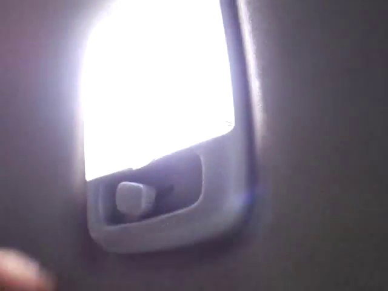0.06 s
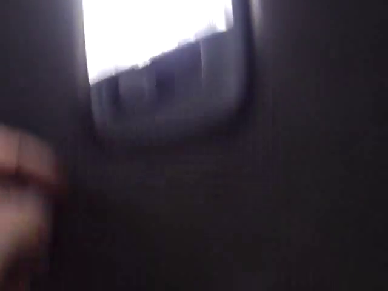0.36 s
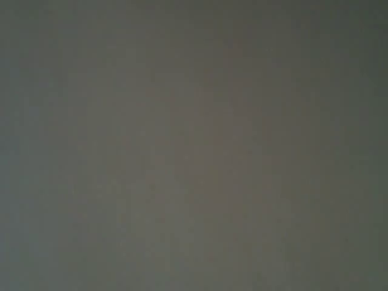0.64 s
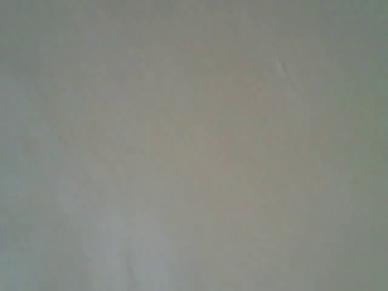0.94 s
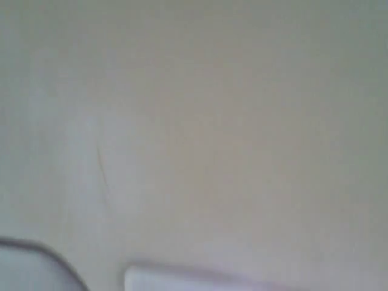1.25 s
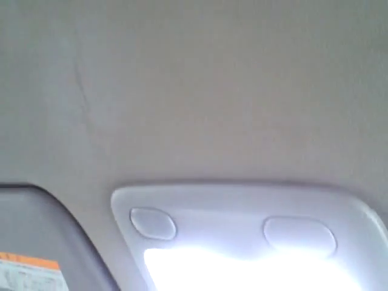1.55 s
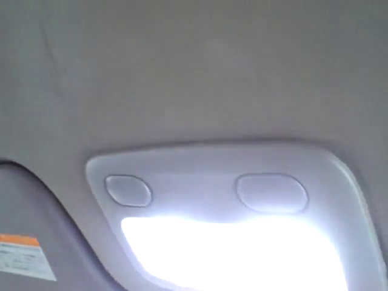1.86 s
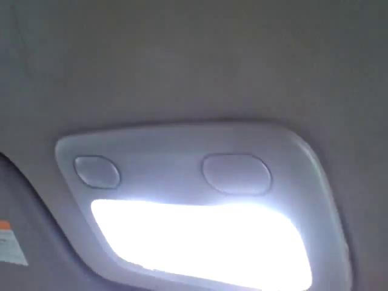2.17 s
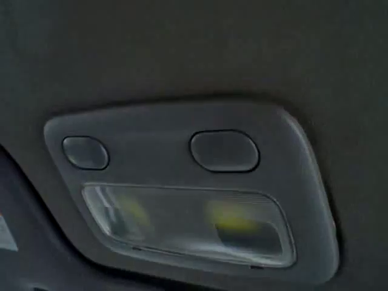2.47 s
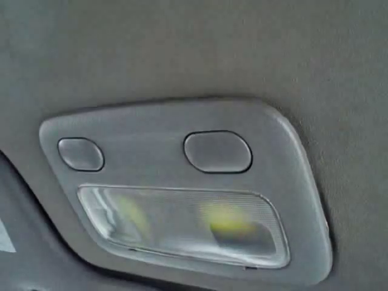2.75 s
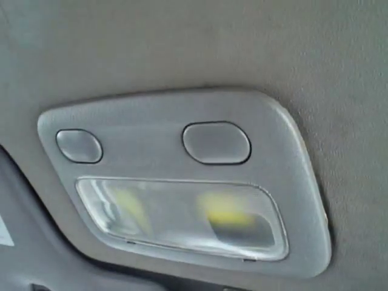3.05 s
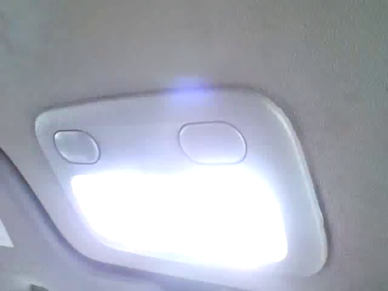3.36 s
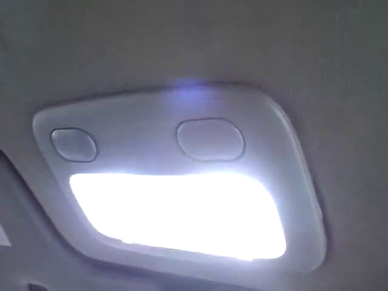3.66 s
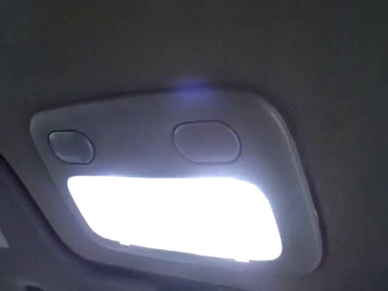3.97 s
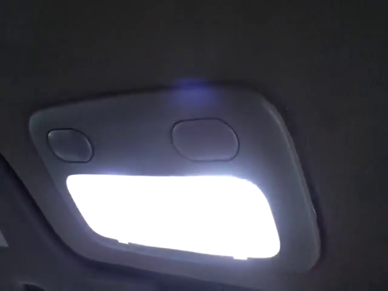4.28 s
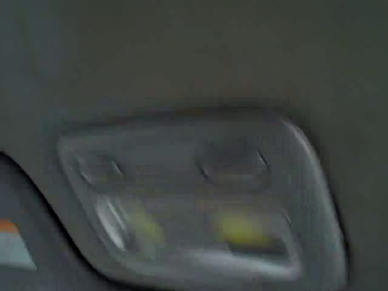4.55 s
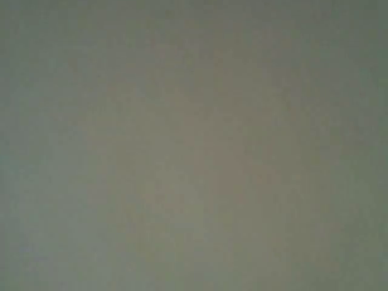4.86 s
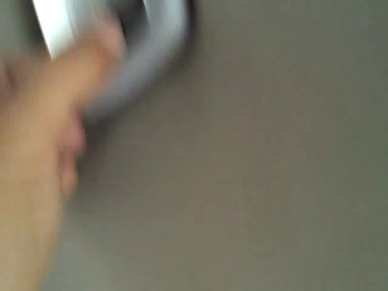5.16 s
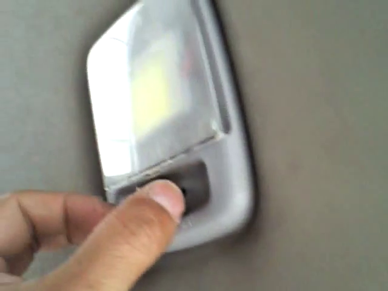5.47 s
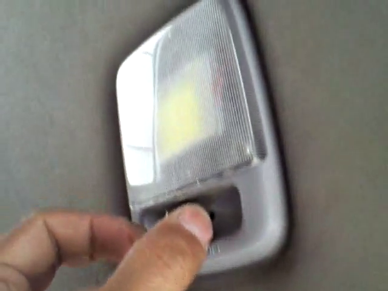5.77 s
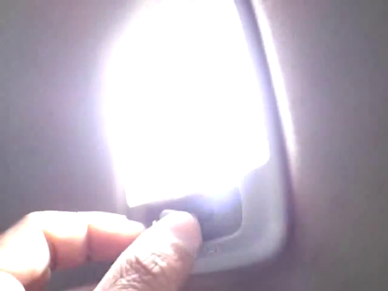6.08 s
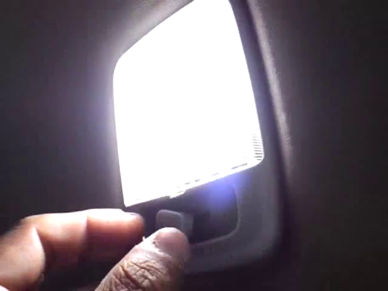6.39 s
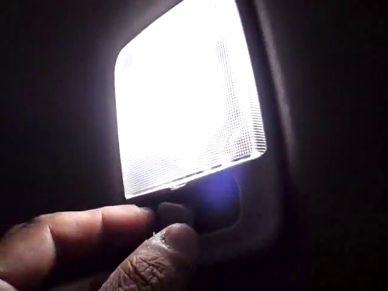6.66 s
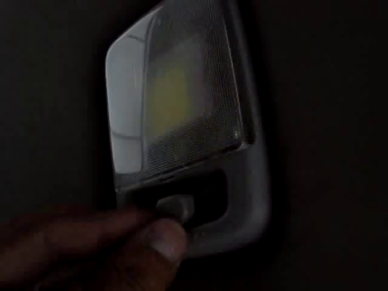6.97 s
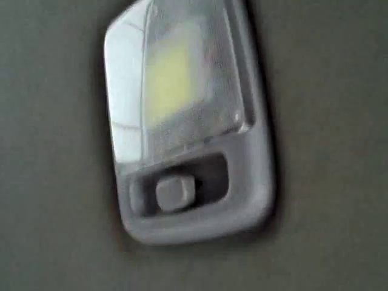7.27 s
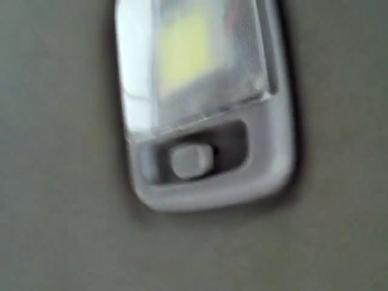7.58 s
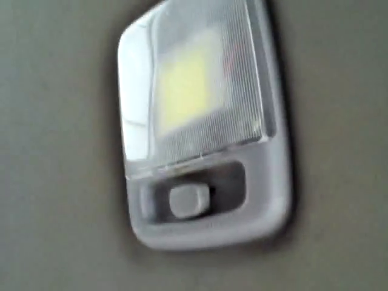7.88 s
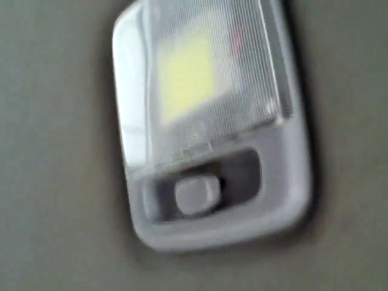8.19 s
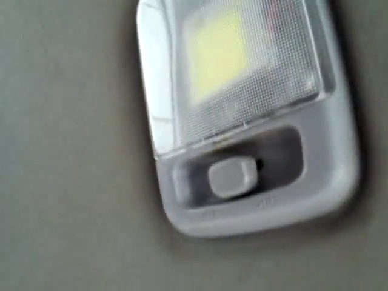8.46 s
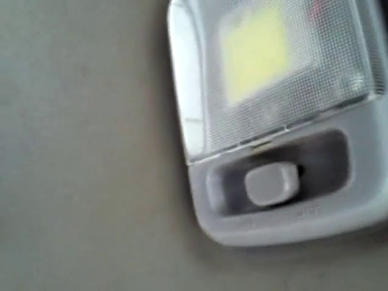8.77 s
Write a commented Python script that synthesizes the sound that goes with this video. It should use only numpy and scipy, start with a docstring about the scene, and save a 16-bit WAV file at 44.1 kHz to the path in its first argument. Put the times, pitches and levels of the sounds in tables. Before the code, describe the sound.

Plastic ceiling lamp switches click sharply inside a parked car, over steady hiss, low rumble and some handling rustles and creaks.

```python
"""Narrow-band microphone hiss, a low rumble and a rustling sleeve open the scene inside a parked car.
The switches of two plastic ceiling lamps are clicked five times, close to a hand-held camera.
Each snap rattles the lamp housing, drums the roof lining and booms briefly in the cabin.
The hand bumps softly throughout; near the end, fingers rub and creak on the camera case.
A last, drier click comes at the camera itself."""
import sys
import numpy as np
from scipy import signal
from scipy.fft import rfft, irfft, next_fast_len
from scipy.io import wavfile
from scipy.ndimage import uniform_filter1d

SR = 44100
rng = np.random.default_rng(int(sys.argv[2]) if len(sys.argv) > 2 else 0)


def int16_out(signal):
    """Quantize to a 16-bit WAV file."""
    q = np.round(np.clip(np.atleast_2d(signal).T, -1, 1) * 32767)
    wavfile.write(sys.argv[1], SR, q.astype(np.int16))


N = 389403
TIME_S = np.arange(N) / SR
AGE_S = TIME_S[:SR]  # time since an onset

# microphone hiss: (frequency [Hz], density [dB])
HISS_SPECTRUM = [(88, -44), (150, -5.5), (172, -22), (200, -1), (411, -1), (446, -1), (572, -5), (902, -4),
                 (1140, -6), (1660, -7.5), (3040, -10.5), (3440, -12.5), (4060, -28.5), (5280, -72.5),
                 (8930, -120)]
# cabin rumble: (frequency [Hz], density [dB])
RUMBLE_SPECTRUM = [(25, -35), (50, -18.5), (90, -5), (145, 0), (200, -8), (320, -10), (600, -16.5),
                   (1500, -47.5)]
# moves of the camera arm: (peak time [s], level [dB])
ARM_MOVES = [(.5, -44), (3.25, -50), (6.2, -51.5), (7.9, -44)]
# sleeve cloth: (frequency [Hz], density [dB])
CLOTH_SPECTRUM = [(59, -45), (100, -11), (145, 1.5), (198, -25), (376, -6.5), (436, -17), (713, -11),
                  (803, -14), (3500, -37.5), (4550, -61), (7700, -120)]
# sleeve strokes: (peak time [s], level [dB], rise [s], fall [s])
SLEEVE_STROKES = [(0.374, -31.5, 0.049, 0.071), (0.539, -33, 0.021, 0.018), (.79, -43, 0.024, 0.023)]
# hand bumps: (time [s], level [dB], pitch [Hz], treble roll-off [dB/octave], t60 [s])
HAND_BUMPS = [(.002, -38, 246, 8.5, 0.046), (.238, -38, 520, 12.5, 0.041), (.528, -32.5, 140, 21, .2),
              (.611, -37, 269, 16, 0.072), (.768, -34.5, 280, 12, 0.17), (.792, -32.5, 480, 38, 0.07),
              (1.622, -39.5, 195, 18, .045), (2.982, -43, 260, 12, .09), (4.266, -43.5, 283, 19, 0.13),
              (5.108, -41, 392, 9.5, 0.12), (6.014, -41, 770, 14.5, 0.16), (6.34, -39.5, 336, 9.5, 0.13),
              (6.65, -39.5, 320, 8.5, 0.14), (7.2, -34, 706, 21, 0.024), (8.628, -33.5, 355, 11.5, 0.021),
              (8.807, -31.5, 337, 9, .2)]
# camera case resonances: (frequency [Hz], width [Hz], creak level [dB], rub level [dB])
CASE_MODES = [(330, 410, 1, -4.5), (1025, 205, -0.5, 0), (1617, 296, -6, -5.5), (2590, 1260, -4, -7.5),
              (3272, 376, -2.5, -5)]
# finger rubs: (peak time [s], level [dB], rise [s], fall [s], pitch [Hz], lift at pitch [dB])
FINGER_RUBS = [(7.490, -40, 0.081, .015, 1800, 7.5), (7.510, -25, 0.01, 0.0065, 1400, 7.5),
               (7.650, -27.5, 0.0095, .033, 1050, 7.5), (7.820, -35.5, 0.078, 0.041, 3550, 9),
               (7.892, -31.5, .004, 0.017, 3500, 4.5), (7.924, -26, 0.019, 0.031, 3500, 3.5)]
# case creaks: (time [s], peak level [dB], pitch [Hz], lift at pitch [dB])
CASE_CREAKS = [(7.3195, -17, 1410, 3), (7.3909, -3, 1364, 17), (7.3936, -8, 1400, 12),
               (7.417, -17.5, 2600, 9), (7.7313, -18.5, 1020, 2), (7.79, -21, 2600, 7.5),
               (7.811, -15, 2700, 19), (7.8233, -7, 1680, 19), (7.833, -14, 1680, 12),
               (7.8506, -10, 3400, 3.5), (7.8594, -6, 1020, 13), (7.915, 1.5, 2600, 5.5),
               (7.924, -6, 3400, 13), (7.937, -13, 1680, 21), (8.0118, -4.5, 850, 21), (8.033, -4, 843, 15),
               (8.461, -26.5, 1920, 24)]
# light, bright first contact of a switch: (frequency [Hz], gain [dB])
CONTACT_SPECTRUM = [(150, -17), (600, -7), (2000, 0.5), (3000, -2), (4200, 2)]
# lamp housing: (frequency [Hz], gain [dB])
HOUSING_SPECTRUM = [(59, -34.5), (100, -5), (200, -7.5), (380, -1), (540, -8), (680, -6), (1050, -9),
                    (1500, -11), (2000, -9.5), (2850, -11), (3400, -19.5), (4000, -35), (5200, -68.5),
                    (8800, -120)]
# housing rattle: (band [Hz], t60 [s])
RATTLE_DECAYS = [(150, .11), (400, 0.11), (900, 0.1), (1700, 0.1), (3200, 0.082)]
# cabin reverberation: (band [Hz], t60 [s])
REVERB_DECAYS = [(150, 0.97), (400, 0.6), (900, 0.24), (1700, 0.27), (3200, 0.054)]
# lamp lens: (frequency [Hz], level [dB], t60 [s])
LENS_MODES = [(863, -3, 0.43), (1193, 1.5, 0.16), (1367, -2, .3), (1373, -10.5, 0.62), (1362, 2, 0.3),
              (1590, 0.5, 0.23), (1574, -5.5, 0.25), (1740, -11, 0.21), (2150, -5, .2)]
# roof lining: (frequency [Hz], level [dB], t60 [s])
LINING_MODES = [(272.4, -2, 0.59), (301.5, -0.5, 0.45), (321, -14, 0.8), (396.4, -8.5, 0.69),
                (431.5, 2.5, 0.42), (543, -3, 0.15), (675, -20, 0.5), (713, -11, 0.47)]
# roof panel: (frequency [Hz], level [dB], t60 [s])
PANEL_MODES = [(92, -2, 0.37), (113, -2.5, 0.22), (139.7, 4, 0.27), (180, -17, 0.18)]
# cabin air: (frequency [Hz], level [dB], t60 [s])
AIR_MODES = [(89.5, -18, 0.2), (125, -10, 0.32), (142.4, -4.5, 0.42), (151.4, -17, 0.93)]
# switch throws: (time [s], contact [dB], lag to blow [s], blow [dB], lens [dB], lining [dB], panel [dB],
# boom [dB], low note [Hz], low lift [dB], high note [Hz], high lift [dB], tilt [dB/octave])
SWITCH_THROWS = [(2.4521, -15.5, 0.0038, -11, -31.5, -24, -47.5, -38.5, 350, 2.5, 1330, 5, 0.5),
                 (3.2283, -13, .0090, -17, -60, -28.5, -17, -17.5, 520, 10, 2850, 9, -2),
                 (4.3824, -18.5, .0050, -9, -27.5, -25, -23, -23, 730, 4, 1400, 8.5, -.5),
                 (5.8204, -21, 0.0027, -11, -57.5, -23.5, -20.5, -26.5, 880, 5, 1850, 0.5, -1),
                 (6.8426, -21, .003, -2.5, -27, -21, -30.5, -28, 1080, 7.5, 1467, 8.5, -1.17),
                 (8.7105, -16.5, 0.01, -15, -58, -44, -36, -57, 215, 8, 2290, 1.5, -0.9)]


def amp(db):
    """Decibels to gain."""
    return 10 ** (np.asarray(db) / 20)


def unit_rms(x):
    """x at rms 1."""
    return x / np.sqrt(np.mean(x ** 2) + 1e-20)


def unit_burst(x, samples=440):
    """x with its loudest window at rms 1."""
    return x / np.sqrt(uniform_filter1d(x ** 2, samples).max() + 1e-20)


def log_interp(points, hz):
    """(frequency [Hz], value) points read on a log axis."""
    points_hz, values = np.transpose(points)
    return np.interp(np.log(hz + 1), np.log(points_hz), values)


def bell(hz, centre_hz, octaves):
    """Gaussian in log frequency, 1 at the centre."""
    return np.exp(-(np.log2(hz / centre_hz) / octaves) ** 2)


def filtered(x, response):
    """x through a response given as a function of Hz."""
    size = next_fast_len(len(x) + 8192)
    return irfft(rfft(x, size) * response(np.fft.rfftfreq(size, 1 / SR)), size)[:len(x)]


def coloured(x, spectrum, size=4096):
    """x through a minimum-phase filter with the given spectrum."""
    gain = amp(log_interp(spectrum, np.fft.rfftfreq(size, 1 / SR)))
    cepstrum = irfft(np.log(gain + 1e-6))
    cepstrum[1:size // 2] *= 2
    cepstrum[size // 2 + 1:] = 0
    impulse = irfft(np.exp(rfft(cepstrum)))
    return signal.fftconvolve(x, impulse)[:len(x)]


def fade(t60_s):
    """Decay of 60 dB in t60_s."""
    return np.exp(-np.log(1000) * AGE_S / t60_s)


def swell(rise_s):
    """Rise from 0 to 1."""
    return 1 - np.exp(-AGE_S / rise_s)


def stroke(t_s, rise_s, fall_s):
    """Pressure that swells up to t_s = 0, then ebbs."""
    return np.exp(-np.abs(t_s) / np.where(t_s < 0, rise_s, fall_s))


def add(track, at_s, sound):
    """Mix a sound into the track."""
    start = round(at_s * SR)
    track[start:start + len(sound)] += sound[:N - start]


def microphone_hiss(level_db=-50):
    """Steady noise of the microphone."""
    return amp(level_db) * unit_rms(coloured(rng.standard_normal(N), HISS_SPECTRUM))


def cabin_rumble(floor_db=-54, rise_s=0.43, fall_s=0.35):
    """Low rumble in the closed cabin swells when the camera is moved."""
    moves = sum(amp(db) * stroke(TIME_S - at_s, rise_s, fall_s) for at_s, db in ARM_MOVES)
    return (amp(floor_db) + moves) * unit_rms(coloured(rng.standard_normal(N), RUMBLE_SPECTRUM))


def sleeve_rustle(grain_db=2):
    """Cloth brushes in uneven grains as the arm is drawn back."""
    pressure = sum(amp(db) * stroke(TIME_S - at_s, rise_s, fall_s)
                   for at_s, db, rise_s, fall_s in SLEEVE_STROKES)
    grain = amp(grain_db * unit_rms(uniform_filter1d(rng.standard_normal(N), size=200)))
    return pressure * unit_rms(coloured(grain * rng.standard_normal(N), CLOTH_SPECTRUM))


def hand_bumps():
    """Soft contacts give dull thuds, hollower with a steeper roll-off."""
    out = np.zeros(N)
    for at_s, db, hz, rolloff_db, t60_s in HAND_BUMPS:
        push = rng.standard_normal(SR) * fade(t60_s) * swell(rise_s=0.009)
        tone = [(hz / 4, -20), (hz, 0), (hz * 2, -rolloff_db), (hz * 16, -4 * rolloff_db)]
        add(out, at_s, amp(db) * unit_burst(coloured(push, tone)))
    return out


def camera_case(force, levels_db, pitch_hz, lift_db, normalise, grip_octaves=0.5):
    """A force drives the case resonances; the grip favours those near its pitch."""
    out = 0
    for k, ((hz, width_hz, *_), db) in enumerate(zip(CASE_MODES, levels_db)):
        mode = filtered(force, lambda f: (2j * f * width_hz / (hz**2 - f**2 + 2j * f * width_hz)) ** 2)
        gain = amp(db + lift_db * bell(hz, pitch_hz, grip_octaves))
        out += (-1) ** k * gain * normalise(mode)
    return out


def finger_rubs(slips_per_s=4000):
    """Skin drags over the case in a dense stream of tiny slips."""
    out, lead_s = np.zeros(N), 0.25
    t_s = AGE_S[:SR // 2] - lead_s
    _, _, _, rub_db = np.transpose(CASE_MODES)
    for at_s, db, rise_s, fall_s, pitch_hz, lift_db in FINGER_RUBS:
        slips = rng.random(len(t_s)) < slips_per_s / SR
        force = slips * np.sign(rng.standard_normal(len(t_s))) * stroke(t_s, rise_s, fall_s)
        add(out, at_s - lead_s, camera_case(force, db + rub_db, pitch_hz, lift_db, unit_burst))
    return out


def case_creaks(chatter_gain=0.081, chatter_t60_s=0.028):
    """The gripped case slips in dry ticks: a jolt, then short chatter."""
    out = np.zeros(N)
    _, _, creak_db, _ = np.transpose(CASE_MODES)
    for at_s, db, pitch_hz, lift_db in CASE_CREAKS:
        force = (chatter_gain * rng.standard_normal(SR) * fade(chatter_t60_s))[:SR // 10]
        force[0] += 1  # jolt
        tick = camera_case(force, creak_db, pitch_hz, lift_db, unit_rms)
        add(out, at_s, amp(db) * tick / np.abs(tick).max())
    return out


def dense_modes(decays, rise_cycles):
    """Crowded modes as noise: each band builds up, then dies at its own rate."""
    noise, out = rng.standard_normal(SR), np.zeros(SR)
    centres_hz = [hz for hz, _ in decays]
    for (hz, t60_s), weights in zip(decays, np.eye(len(decays))):
        band = filtered(noise, lambda f: log_interp(list(zip(centres_hz, weights)), f))
        out += band * fade(t60_s) * swell(rise_cycles / hz)
    return out


def ring(modes, rise_s, blur_hz, spread_db=2.3):
    """Damped modes struck at random strengths; loose trim blurs each line."""
    out = 0
    step_cycles = np.sqrt(blur_hz / (2 * np.pi * SR))
    for hz, db, t60_s in modes:
        phase_cycles = rng.random() + step_cycles * np.cumsum(rng.standard_normal(SR))
        envelope = amp(db + rng.normal(0, spread_db)) * fade(t60_s)
        out += envelope * np.sin(2 * np.pi * (hz * AGE_S + phase_cycles))
    return unit_burst(swell(rise_s) * out)


def housing_tone(low_hz, low_db, high_hz, high_db, tilt_db_per_octave, note_octaves=0.25):
    """Housing spectrum, tilted, with the two notes that one throw favours."""
    hz = np.geomspace(50, 9000, 160)
    notes_db = low_db * bell(hz, low_hz, note_octaves) + high_db * bell(hz, high_hz, note_octaves)
    tilt_db = tilt_db_per_octave * np.log2(hz / high_hz)
    return np.transpose([hz, log_interp(HOUSING_SPECTRUM, hz) + notes_db + tilt_db])


def switch_contact(force, tone):
    """A light, bright touch of the switch, heard through the housing."""
    return unit_burst(coloured(coloured(force, CONTACT_SPECTRUM), tone), samples=180)


def switch_clicks(slide_db=-17.5, send_db=-11, lining_share=0.35, panel_lag_s=0.012, boom_lag_s=0.087):
    """The switch slides, tips over its spring, slams home and shakes lens, roof and cabin air."""
    out, lead_s = np.zeros(N), 0.1
    for at_s, contact_db, lag_s, blow_db, lens_db, lining_db, panel_db, boom_db, *notes in SWITCH_THROWS:
        tone = housing_tone(*notes)
        scrape = stroke(AGE_S[:SR // 5] - lead_s, rise_s=0.003, fall_s=0.003)
        slide = rng.standard_normal(len(scrape)) * scrape
        contact = rng.standard_normal(SR) * fade(t60_s=0.035)
        add(out, at_s - lead_s, amp(contact_db + slide_db) * switch_contact(slide, tone))
        add(out, at_s, amp(contact_db) * switch_contact(contact, tone))

        reverb_db = send_db + blow_db + lining_share * (lining_db - blow_db)
        rattle = amp(blow_db) * unit_burst(coloured(dense_modes(RATTLE_DECAYS, rise_cycles=0.73), tone))
        reverb = amp(reverb_db) * unit_burst(coloured(dense_modes(REVERB_DECAYS, rise_cycles=4.8), tone))
        lens = amp(lens_db) * ring(LENS_MODES, rise_s=0.008, blur_hz=25)
        lining = amp(lining_db) * ring(LINING_MODES, rise_s=0.0048, blur_hz=6.7)
        add(out, at_s + lag_s, rattle + reverb + lens + lining)

        # the heavy panel follows late; as the finger lets go, the cabin air booms
        add(out, at_s + panel_lag_s, amp(panel_db) * ring(PANEL_MODES, rise_s=0.014, blur_hz=3))
        add(out, at_s + boom_lag_s, amp(boom_db) * ring(AIR_MODES, rise_s=0.015, blur_hz=0.66))
    return out


def scene():
    """All sources at one microphone."""
    clicks = switch_clicks()
    handling = case_creaks() + finger_rubs() + hand_bumps() + sleeve_rustle()
    return (clicks + handling + cabin_rumble() + microphone_hiss())[None]


def record(dry, band_hz=4020, top_hz=17500):
    """Telephone-like band; the hardest peaks overload, clip again and spit a little treble."""
    overloaded = np.clip(dry[0], -1.2, 1.2)
    narrow = filtered(overloaded, lambda hz: 1 / (1 + (hz / band_hz) ** 60))
    clipped = np.clip(narrow, -1, 1)
    return filtered(clipped, lambda hz: 1 / (1 + (hz / top_hz) ** 60))[None]


dry = scene()
out = record(dry)
int16_out(out)
```